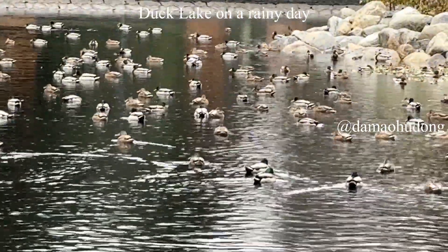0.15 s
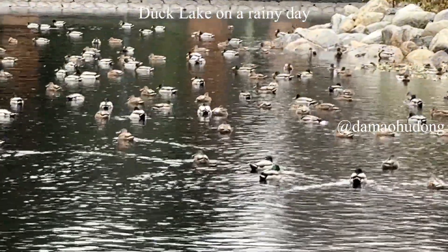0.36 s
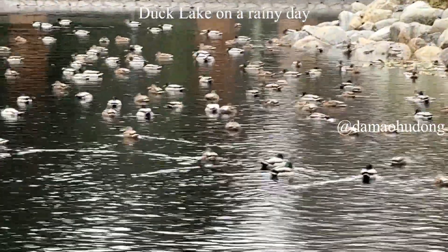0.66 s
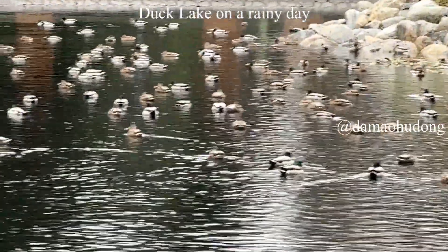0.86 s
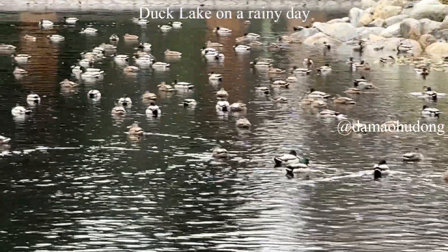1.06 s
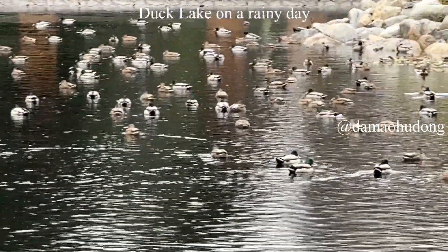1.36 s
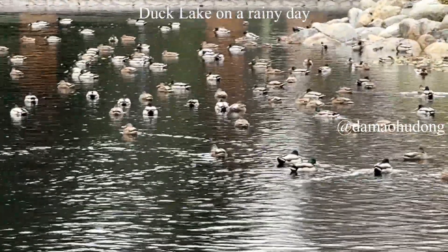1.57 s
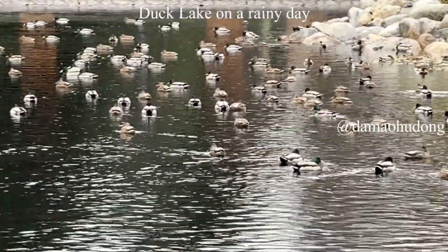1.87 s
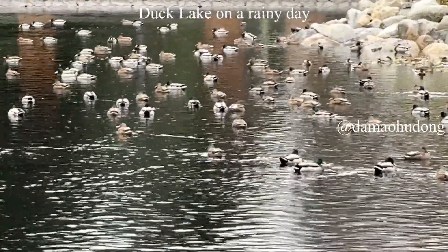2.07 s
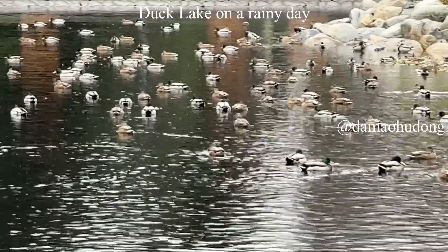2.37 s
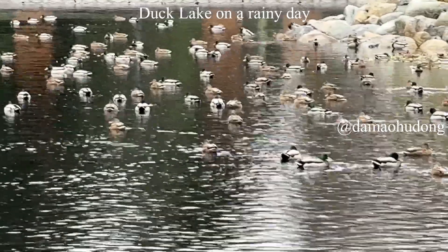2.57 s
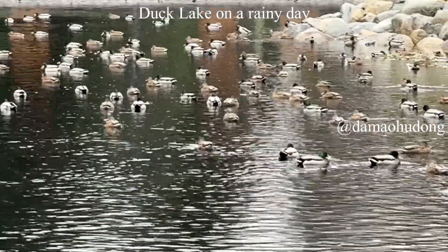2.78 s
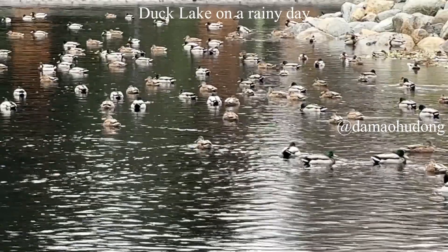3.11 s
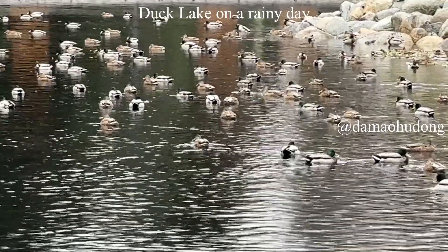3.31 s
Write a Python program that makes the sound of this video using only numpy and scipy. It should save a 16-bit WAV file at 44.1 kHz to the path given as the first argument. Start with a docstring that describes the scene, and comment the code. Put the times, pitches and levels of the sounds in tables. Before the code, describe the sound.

Ten hoarse duck quacks follow one another at a steady pace, sinking in pitch and softening, centred before the microphone. Behind them a lake adds a light echo, with rumbling wind, a faint wash of rain and occasional close drips.

```python
"""A low rumble of wind and a faint wash of rain lie over a lake; three near drops tick.
A mallard hen then gives ten quacks, the run growing lower, shorter and duller. Each is a buzz
of paired pulses that rings her throat and turns hoarse as the breath runs out; the far bank
throws it back. A few more drops fall among the later quacks, and two after the last."""
import sys
import numpy as np
from scipy import signal
from scipy.io import wavfile
from scipy.ndimage import uniform_filter1d, map_coordinates

SR = 44100
rng = np.random.default_rng(int(sys.argv[2]) if len(sys.argv) > 2 else 0)


def wrap_up_sound(samples):
    """Save the sound to the file named by the first command line argument, as 16-bit audio."""
    columns = np.atleast_2d(samples).T
    # keep every value between -1 and 1, then stretch to whole-number steps
    tamed = np.clip(columns, -1, 1)
    steps = np.round(tamed * 32767).astype(np.int16)
    wavfile.write(sys.argv[1], SR, steps)


N = 152145
BINS_HZ = np.fft.rfftfreq(2048, 1 / SR)

# start_s, length_s, attack_s, top_s, top_hz, fall_ratio, gain_db, sag_db, tuning_ratio,
# upper_db, treble_db, second_ratio, second_at_cycles, hoarse_ratio, croak_db
QUACK_RUN = [ (0.237, 0.21, 0.012, 0.11, 248.7, .13, -15.5, -2, 1.103, 0.5, -4.5, 0.61, .49, 0.03, -25),
             (0.548, 0.23, 0.024, .098, 240, .15, -17.5, -0.5, 1.002, 3, -2, 0.67, .495, 0.37, -26),
             (0.877, 0.24, 0.033, 0.093, 224.2, 0.15, -18.5, -1.5, 0.96, 2.5, -1.5, 0.63, .49, 0.11, -22.5),
             (1.213, 0.23, 0.021, 0.077, 211.8, 0.18, -19, -8, 0.96, 2.5, -3.5, 0.69, .49, 0.16, -9),
             (1.542, 0.22, 0.016, 0.075, 200.7, 0.22, -20, -12.5, 0.98, 2.5, -1.5, 0.62, 0.48, 0.8, -5.5),
             (1.862, .202, 0.014, 0.076, 193.4, 0.2, -19, -13.5, 1, 1.5, -0.5, 0.79, 0.39, 0.6, -7.5),
             (2.170, 0.19, 0.018, 0.067, 182.6, 0.16, -20, -11, 1.013, 0, 1.5, 0.95, 0.4, 0.37, -6),
             (2.476, 0.18, 0.0099, .060, 176, .11, -19, -14.5, 1.002, 3, 2, 0.55, .445, 0.31, -6.5),
             (2.777, .162, 0.018, 0.061, 168, 0.11, -19.5, -10.5, 1.007, 4, 2.5, 1, 0.39, 0.42, -12.5),
             (3.080, .130, 0.012, 0.05, 167.5, 0.13, -20.5, -6, 0.98, 4.5, 1.5, 0.66, 0.41, 0.3, -20.5)]

def mallard():
    """Ten quacks, the throat going from hard to soft."""
    duck = np.zeros(N)
    for progress, (start_s, *settings) in zip(np.linspace(0, 1, len(QUACK_RUN)), QUACK_RUN):
        softness = np.sin(np.pi / 2 * progress) ** 2
        add(duck, start_s, quack(softness, *settings))
    return duck


def quack(softness, length_s, attack_s, top_s, top_hz, fall_ratio, gain_db, sag_db, tuning_ratio,
          upper_db, treble_db, second_ratio, second_at_cycles, hoarse_ratio, croak_db):
    """One breath: the pitch arches, the level dips briefly, a last push of slow pulses croaks."""
    t = np.arange(0, length_s, 1 / SR)
    early = np.maximum(1 - t / top_s, 0)
    late = np.maximum((t - top_s) / (length_s - top_s), 0)
    croak = np.exp(-((t - length_s + .016) / .012) ** 2)
    choke = np.exp(-((t - length_s + .034) / .008) ** 2)
    croak_gain, fall = amp(croak_db), fall_ratio * late ** 1.35

    pitch_hz = top_hz * (1 - .38 * early ** 2.4 - fall - .5 * croak_gain * croak)
    pitch_hz = np.maximum(pitch_hz * waver(len(t)), top_hz / 3)
    hoarseness = hoarse_ratio * np.sin(np.pi / 2 * late) ** 2 * (1 - croak / 2)
    roughness = .07 + .4 * np.exp(-t / .026) + hoarseness
    source = voice(t, pitch_hz, roughness, second_ratio, second_at_cycles)

    attack = np.minimum((t + 1 / top_hz) / attack_s, 1)
    release = np.minimum((length_s - t) / .012, 1)
    sag = amp(sag_db * late ** 1.77 - 16 * croak_gain * choke)
    breath = attack * release * (sag + croak_gain * croak)
    arch = 1 - fall_ratio * early ** 2 - fall
    call = bill(source, t, late) * breath
    body, rasp = throat(call, arch, softness, tuning_ratio, upper_db, treble_db)
    return amp(gain_db) * (body + ripple(rasp))


def waver(samples, depth_ratio=.0061, drift_s=.0081):
    """Random pitch factor around 1."""
    drift = signal.lfilter([1], [1, -np.exp(-1 / (drift_s * SR))], rng.standard_normal(SR))
    return 1 + depth_ratio * unit_rms(drift)[:samples]


def voice(t, pitch_hz, roughness, second_ratio, second_at_cycles, jitter_s=.00019, puff_cycles=.39):
    """Two pulses and a puff of air per cycle; roughness scales jitter, shimmer and hiss."""
    phase_cycles = np.cumsum(pitch_hz) / SR
    cycles, buzz = np.arange(int(phase_cycles[-1])), 0
    for offset_cycles, size in (0, 1), (second_at_cycles, second_ratio):
        at_s = np.interp(cycles + offset_cycles, phase_cycles, t)
        jitter, shimmer = rng.standard_normal((128, 2))[:len(at_s)].T * np.interp(at_s, t, roughness)
        fade_in = 1 - (offset_cycles > 0) * np.exp(-(at_s / .011) ** 2)  # second pulse only
        buzz = buzz + pulses(at_s + jitter_s * jitter, size * fade_in * np.exp(.4 * shimmer), len(t))
    puffs = np.exp(-(phase_cycles % 1) / puff_cycles) * rng.standard_normal(SR)[:len(t)]
    return unit_rms(unit_rms(buzz) + .8 * roughness * unit_rms(puffs))


def pulses(times_s, sizes, samples, half_width=8):
    """Sharp clicks placed between samples by windowed sinc."""
    train, at = np.zeros(samples), times_s[:, None] * SR
    near = np.floor(at).astype(int) + np.arange(1 - half_width, half_width + 1)
    clicks = sizes[:, None] * np.sinc(near - at) * np.sinc((near - at) / half_width)
    np.add.at(train, np.clip(near, 0, samples - 1), clicks)
    return train


def bill(x, t, late, split_hz=2100, shut_db=-20, open_s=.022, close_db=-8):
    """The bill opens to let the highs out, then partly shuts."""
    dull = signal.lfilter(*signal.butter(2, split_hz, fs=SR), x)
    bright = signal.lfilter(*signal.butter(2, split_hz, "highpass", fs=SR), x)
    opening = amp(shut_db * np.exp(-t / open_s) + close_db * late ** 2)
    return dull - opening * bright


# Throat response, first quack and last: freq_hz, gain_db
HARD_THROAT = [(150, -41), (330, -18), (480, -25), (650, -27.5), (950, -19), (1100, -19), (1380, -5.5),
               (1600, -8), (1830, -5), (2080, -14.5), (2400, -3.5), (2800, -5.5), (3150, -16),
               (3750, -10.5), (4150, -9), (4600, -23), (5200, -17.5), (6250, -15), (7100, -32.5),
               (8000, -31.5), (10000, -44.5), (14000, -58), (17000, -70)]
SOFT_THROAT = [(130, -39.5), (250, -25.5), (350, -11.5), (500, -37), (700, -22), (950, -26), (1230, -4.5),
               (1420, -8), (1600, 5.5), (1760, 0.5), (2020, -11.5), (2420, -9), (2850, -8), (3350, -30),
               (3700, -22.5), (4300, -26), (4850, -34), (5500, -27.5), (6300, -33), (7300, -56),
               (8300, -57.5), (10000, -72), (16000, -80.5)]

def throat(x, arch, softness, tuning_ratio, upper_db, treble_db, upper_hz=2020, treble_hz=3500):
    """Resonances glide with the pitch arch: the low body a little, the treble rasp more."""
    treble = above(BINS_HZ, treble_hz)
    tuned_hz = BINS_HZ / (tuning_ratio + (1 - tuning_ratio) * treble)
    gain_db = (1 - softness) * lookup(HARD_THROAT, tuned_hz) + softness * lookup(SOFT_THROAT, tuned_hz)
    gain_db = gain_db + upper_db * above(BINS_HZ, upper_hz) + (treble_db - upper_db) * treble
    gain_db -= 10 * np.log10(np.mean(amp(gain_db) ** 2))
    crossover = above(BINS_HZ, treble_hz, order=24)
    body = glide(x, arch ** .26, gain_db + 10 * np.log10(1 - crossover + 1e-9))
    rasp = glide(x, arch ** .7, gain_db + 10 * np.log10(crossover + 1e-9))
    return body, rasp


def glide(x, stretch, gain_db):
    """Resample, filter, resample back: all resonances move by the factor stretch."""
    clock = np.cumsum(stretch) - stretch[0]
    positions = np.interp(np.arange(clock[-1]), clock, np.arange(len(x)))
    rung = colour(map_coordinates(x, [positions], order=5), gain_db)
    ring_out = clock[-1] + stretch[-1] * np.arange(1, 700)
    return map_coordinates(rung, [np.r_[clock, ring_out]], order=5)


def ripple(x, decay_s=.0027, scatter_db=3.5):
    """Rippled water smears each pulse with scattered reflections."""
    t = np.arange(SR // 50) / SR
    scatter = unit_rms(rng.standard_normal(len(t)) * np.exp(-t / decay_s))
    taps = (t == 0) + scatter * amp(scatter_db) / np.sqrt(len(t))
    return signal.fftconvolve(x, taps / np.linalg.norm(taps))[:len(x)]


# delay_s, gain_db
LAKE_ECHOES = [(.0011, -25.5), (.013, -13.5), (.034, -15.5), (.058, -25), (.083, -30.5)]
# freq_hz, gain_db, t60_s
LAKE_TAIL = [(300, -8, .6), (1250, -6, .7), (1650, -2, .75), (1820, -2, .75), (2020, 4, .95),
             (2400, -3, .65), (2900, -5, .55), (5500, -8, .45), (12000, -14, .3)]

def lake(x, tail_delay_s=.025, tail_gain_db=-13):
    """Single echoes off water and banks, and a scattered tail."""
    hz, t, noise = signal.stft(rng.standard_normal(SR), SR, nperseg=256)
    bands = np.array(LAKE_TAIL)
    gain_db = lookup(bands[:, [0, 1]], hz)[:, None]
    t60_s = lookup(bands[:, [0, 2]], hz)[:, None]
    tail = signal.istft(noise * amp(gain_db - 60 * t / t60_s), SR)[1]
    response = np.zeros(SR)
    add(response, tail_delay_s, amp(tail_gain_db) * tail / np.sqrt(SR / 20))
    for delay_s, echo_db in LAKE_ECHOES:
        add(response, delay_s, amp(echo_db) * signal.windows.hann(7)[1:-1] / 3)
    return signal.fftconvolve(x, response)[:N]


# freq_hz, density_db
WIND_SPECTRUM = [(15, -38), (30, -21), (45, -9), (62, 1), (80, -6), (110, -11), (170, -16), (250, -24),
                 (400, -36), (800, -60)]
# time_s, gain_db
WIND_GUSTS = [(0.0, -23), (0.09, -36.5), (0.25, -27), (0.33, -41), (0.35, -30.5), (0.5, -35.5),
              (0.98, -35.5), (1.02, -27.5), (1.21, -34), (1.28, -29.5), (1.5, -35), (3.29, -34),
              (3.31, -37), (3.45, -40.5)]

def wind():
    """Low rumble swelling in gusts."""
    band = signal.butter(2, [32, 900], "bandpass", fs=SR, output="sos")
    rumble = signal.sosfilt(band, stereo_noise(WIND_SPECTRUM, patchy_db=0))
    return rumble * amp(np.interp(np.arange(N) / SR, *np.transpose(WIND_GUSTS)))


# start_s, level_db, centre_hz
NEAR_DROPS = [(0.113, -52, 5000), (.140, -53, 5500), (.168, -53.5, 4800), (1.960, -43, 12500),
              (2.503, -58, 12000), (2.585, -58, 11000), (3.400, -59, 7000), (3.436, -47, 5000)]
# freq_hz, density_db
RAIN_SPECTRUM = [(60, -13.5), (200, 7), (400, -2), (700, -0.5), (1500, -7.5), (2500, -15.5), (4000, -21),
                 (7000, -33), (10000, -45), (13500, -38), (16000, -47.5)]

def rain(decay_s=.0023, half_width_octaves=.45, wash_db=-45):
    """Near drops as short bright ticks, over a faint wash on the water."""
    ticks, t = np.zeros(N), np.arange(SR // 20) / SR
    for start_s, level_db, centre_hz in NEAR_DROPS:
        octaves = np.log2((BINS_HZ + 1) / centre_hz)
        band_db = -10 * np.log10(1 + (octaves / half_width_octaves) ** 4)
        splash = colour(rng.standard_normal(len(t)), band_db)[:len(t)]
        add(ticks, start_s, amp(level_db) * unit_rms(splash) * np.exp(-t / decay_s))
    return ticks + amp(wash_db) * stereo_noise(RAIN_SPECTRUM, patchy_db=.5)


# Left-right likeness: freq_hz, coherence_ratio
STEREO_COHERENCE = [(30, 1), (120, 0.92), (300, 0.76), (700, 0.42), (1500, 0.95), (8000, 1), (13000, .6)]

def stereo_noise(spectrum, patchy_db, frame=2048):
    """Shaped two-channel noise with drifting patches of level."""
    hz = np.fft.rfftfreq(frame, 1 / SR)
    a, b, c, d, patches = rng.standard_normal((N * 4 // frame + 5, len(hz), 5)).T
    patches = unit_rms(uniform_filter1d(uniform_filter1d(patches, size=16, axis=0), size=6, axis=1))
    coherence = np.clip(lookup(STEREO_COHERENCE, hz), -1, 1)[:, None]
    left = a + 1j * b
    right = coherence * left + np.sqrt(1 - coherence ** 2) * (c + 1j * d)
    shaped = np.array([left, right]) * amp(lookup(spectrum, hz)[:, None] + patchy_db * patches)
    return unit_rms(signal.istft(shaped, nperseg=frame, noverlap=frame * 3 // 4)[1][:, :N])


def amp(db):
    return 10 ** (np.asarray(db) / 20)


def unit_rms(x):
    return x / np.sqrt(np.mean(x ** 2) + 1e-20)


def lookup(points, hz):
    """Interpolate on a log-frequency axis."""
    points_hz, values = np.transpose(points)
    return np.interp(np.log(hz + 1), np.log(points_hz + 1), values)


def above(hz, edge_hz, order=12):
    """Soft step from 0 to 1."""
    return 1 / (1 + (edge_hz / (hz + 1)) ** order)


def colour(x, gain_db):
    """Minimum-phase filter, one gain per bin of BINS_HZ."""
    log_gain = np.log(amp(np.maximum(np.r_[gain_db, gain_db[-2:0:-1]], -100)))
    response = np.fft.ifft(np.exp(np.conj(signal.hilbert(log_gain)))).real
    return signal.fftconvolve(x, response[:1024])


def add(mix, start_s, sound):
    part = mix[max(round(start_s * SR), 0):][:len(sound)]
    part += sound[:len(part)]


def scene():
    """The duck straight ahead with her echoes, in wind and rain."""
    duck = mallard()
    return duck + lake(duck) + wind() + rain()


def record(dry):
    """Steep low-pass at 15.4 kHz."""
    taps = signal.firwin(511, 15400, window=("kaiser", 9), fs=SR)
    return signal.oaconvolve(dry, taps[None], "same")


dry = scene()
out = record(dry)
wrap_up_sound(out)
```